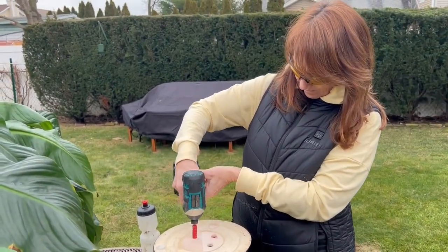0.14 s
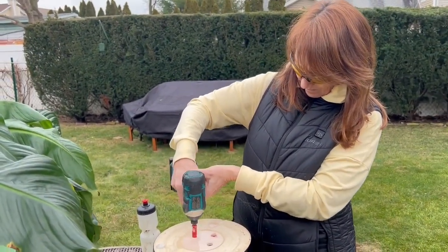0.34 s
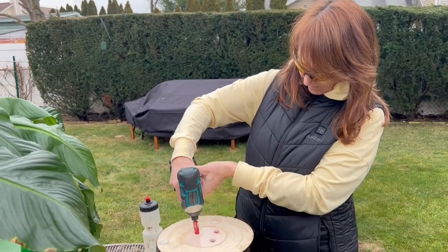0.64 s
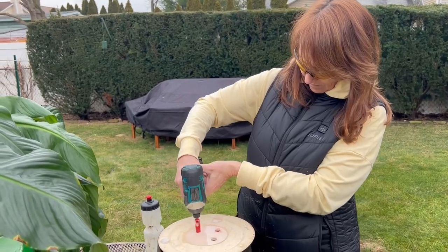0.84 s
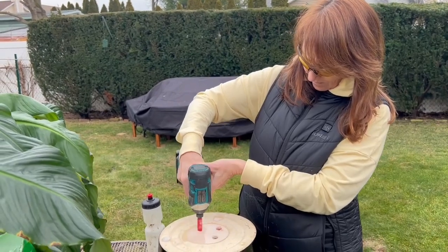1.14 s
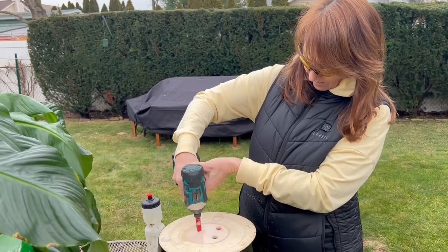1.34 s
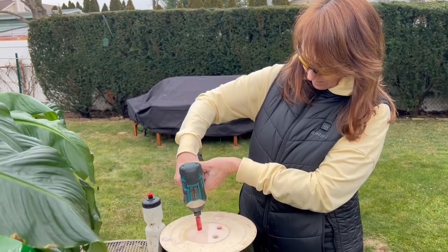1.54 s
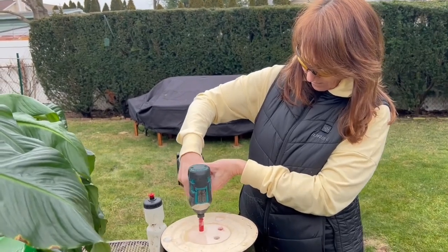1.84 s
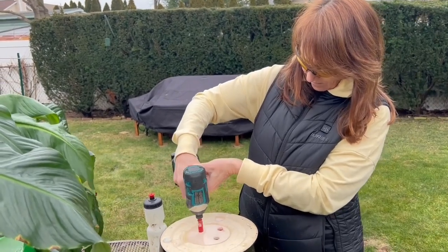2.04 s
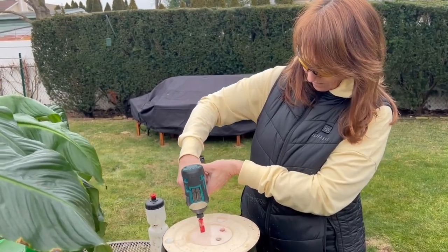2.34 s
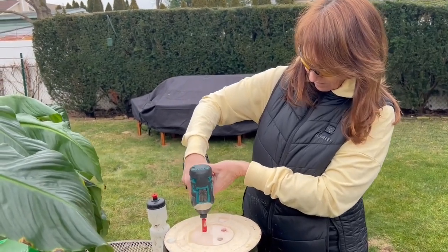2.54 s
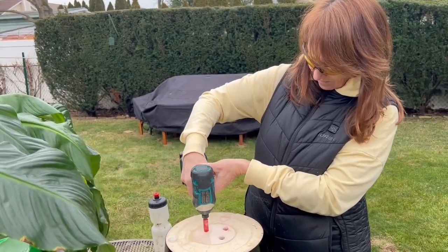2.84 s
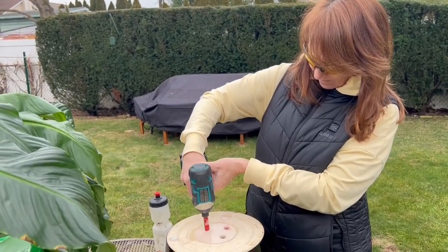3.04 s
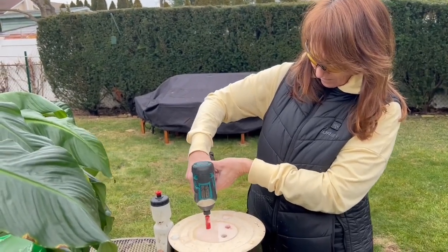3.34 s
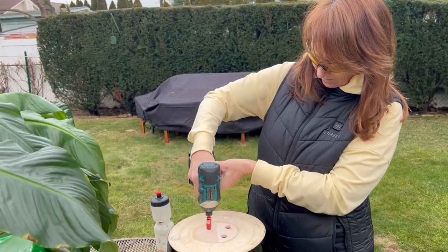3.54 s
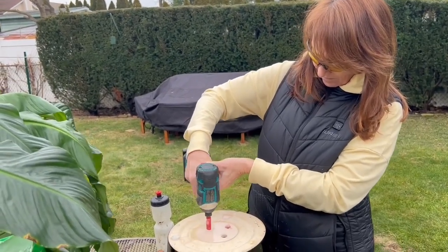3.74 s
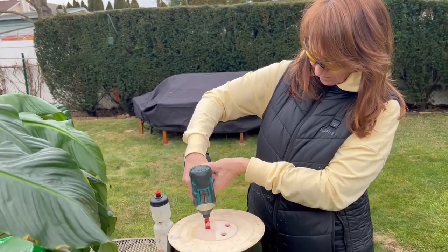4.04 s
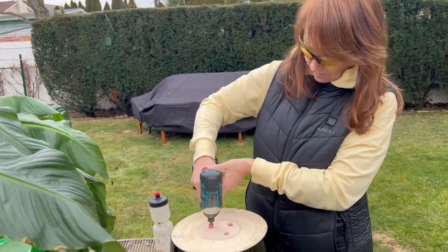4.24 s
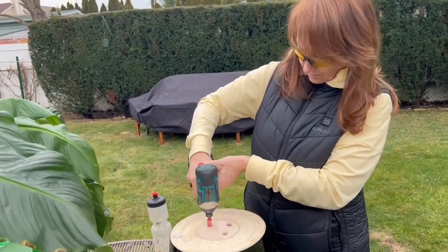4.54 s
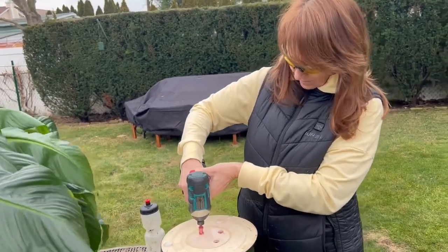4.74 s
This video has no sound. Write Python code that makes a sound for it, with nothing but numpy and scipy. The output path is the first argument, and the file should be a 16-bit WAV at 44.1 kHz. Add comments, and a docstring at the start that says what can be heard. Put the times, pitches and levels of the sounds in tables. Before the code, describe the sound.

From 0 s a cordless drill is already cutting an upturned ceramic pot in an open garden, heard in stereo from a metre or two. Dense grit bites make a harsh, metallic-sounding ceramic ring, strongest around 1, 1.8 and 3 kHz, over a wavering hollow boom near 260 Hz. A rapid throb of about 25 per second, motor hum and thin whine follow the drill speed. Dusty, airy hiss starts softer and grows by about 1 s. Pitch rises slightly until 1.9 s, sags near 2.2 s, then partly recovers; irregular catches jolt the grind, harder around 1.55 and 2.9 s. At 4.03 s a brief squeak near 950 Hz leads to a sharp breakthrough knock at 4.09 s, with hollow boom, dull blows and loose rattle. More squeaks follow around 4.2 s. After 4.28 s grinding and hiss collapse, leaving faint low hum and garden air, with a tiny faint squeak at 4.86 s.

```python
"""In a garden, a cordless drill grinds a diamond core bit through the base of an upturned ceramic pot, a metre or two
from a phone. Random grit bites ring the pot's modes and throb once a turn, with sine tones locked to the motor;
filtered noise makes the dust and cooling-air hiss. The bit breaks through with a knock of half-sine blows, squeaks
in near-pure tones and runs down over a low sine hum and faint noise of garden air."""
import sys
import numpy as np
from scipy import signal
from scipy.fft import rfft, irfft
from scipy.io import wavfile
from scipy.ndimage import uniform_filter1d

SR = 44100
rng = np.random.default_rng(int(sys.argv[2]) if len(sys.argv) > 2 else 0)


def persist_wave(psi):
    """Save psi, clipped to +-1, as 16-bit WAV."""
    counts = np.round(np.clip(psi, -1, 1) * 32767).astype(np.int16)
    wavfile.write(sys.argv[1], SR, np.atleast_2d(counts).T)


N = 215693

THROUGH_S, RELEASE_S = 4.09, 4.28  # the bit breaks through; the trigger is let go
GEAR_RATIO = 32 / 3  # motor turns per chuck turn
# the hollow's boom wavers as the hands rock the drill; its pitch dips after the breakthrough, then rises again:
# [start_s, pitch_hz, level_db against the cut]
HOLLOW_PATH = [(0, 260, 1), (.2, 252, 1), (.4, 260, -3), (.77, 257, -4), (.92, 276, 2), (1.1, 259, 1),
               (1.33, 256, -1), (1.56, 265, 4), (1.65, 262, -2), (1.93, 257, -4), (2.02, 246, 2),
               (2.17, 232, 1), (2.27, 258, 0), (2.53, 266, 5), (2.67, 258, -7), (2.77, 251, 1),
               (3.04, 256, 2), (3.16, 257, -5), (3.37, 266, 2), (3.6, 254, 0), (3.7, 262, -6),
               (3.9, 256, 0), (4.08, 262, -1), (4.1, 262, -2), (4.12, 244, -4), (4.16, 240, -5),
               (4.2, 236, -4), (4.32, 230, 3), (4.42, 270, 0)]


def pot(grind_db, hollow_db, turn, throb_db):
    """Bites, blows and catches ring the pot's modes; each hears them its own way and wanders as the hands rock."""
    # modes of the pot, the hollow's air first: [pitch_hz, nominal width_hz, relative left_db, right_db,
    # lead_rad of the right side]
    pot_modes = [(258, 35, -38.7, -39.6, -0.15), (735, 55, -47.3, -51.9, -0.68),
                 (820, 50, -49.5, -54.4, -0.68), (965, 35, -36.4, -43.1, -0.42),
                 (1010, 40, -34.3, -39.4, -0.57), (1125, 45, -33.2, -44.6, 0.06),
                 (1190, 40, -37.1, -46.2, -0.47), (1355, 60, -48, -54, -0.01),
                 (1635, 50, -43.8, -50.7, -0.13), (1770, 30, -37.7, -39.7, 1.18),
                 (1820, 30, -34.4, -38.1, 0.39), (2000, 60, -45, -42, 0.23), (2065, 50, -48, -45, 0.1),
                 (2190, 90, -51, -48, -0.2), (2530, 70, -50.2, -45.4, -0.72),
                 (2930, 70, -35.4, -30.3, -2.02), (3040, 60, -34.5, -30.5, -2.02),
                 (3160, 40, -45.9, -42.5, -2.16), (3470, 50, -44.2, -41.8, -2.85),
                 (3590, 50, -50, -49.5, 2.99), (3710, 70, -49, -49, 1.5), (3920, 60, -48, -48, 1.5),
                 (4040, 80, -46.4, -46.9, 2.31), (4195, 85, -43, -40.7, -0.91), (4310, 45, -45, -44, -3.03),
                 (4470, 60, -44.6, -46.5, 2.79), (4765, 50, -52.3, -47.5, 0.65),
                 (5050, 70, -47.4, -47.8, 2.8), (5780, 120, -44.0, -48.1, 2.21),
                 (6090, 60, -45.7, -52.4, 0.99), (6510, 60, -46.6, -52.7, 1.58),
                 (7310, 80, -49.4, -50.1, 0.88), (7510, 45, -49.8, -52.6, 0.51),
                 (7745, 55, -45.5, -46.3, 0.88)]
    coast_db, coast_db_per_s, coast_hz = -25, 72, 4000
    chatter_db, chatter_per_s = 1.8, 70
    boom_clean = 1.4  # size of the clean tone in the boom
    sway_s = 2.5e-5 * walk(3.66)  # hands and drill shift the path to one side

    bites, knock, grab = grit(2500, 3.7), blows(), catches(turn)
    hollow_hz = pot_modes[0][0]
    bend = np.exp(2j * np.pi * np.cumsum(curves(HOLLOW_PATH)[0] - hollow_hz) / SR)
    # the coasting bit still brushes the hole, brightest near coast_hz
    coast_level_db = coast_db - coast_db_per_s * since(RELEASE_S) + 4 * walk(15)
    coast = (since(RELEASE_S) > 0) * undb(coast_level_db)
    # quick shudder shared by the wall modes, without slow swells
    shudder = walk(chatter_per_s)
    shudder_db = chatter_db * (shudder - uniform_filter1d(shudder, size=SR // 8))
    clean = boom_clean * undb(hollow_db) * np.exp(2j * np.pi * hollow_hz * since(0))
    clean = clean * (since(THROUGH_S) == 0)

    out = np.zeros((2, N))
    for hz, width, left_db, right_db, lead in pot_modes:
        is_hollow = hz < 400
        if is_hollow:
            drive_db, knock_db = hollow_db - 1.5, 44
        else:
            drive_db, knock_db = grind_db + shudder_db, 42
        throb = .5 * throb_db * np.cos(turn - .5 * rng.standard_normal())
        drive_db = drive_db + throb + .7 * walk(30)
        brush = coast / (1 + (np.log(hz / coast_hz) / 0.25) ** 2)
        dust = rng.standard_normal(N)
        force = (0.47 * bites + 0.76 * dust) * (undb(drive_db) + brush)
        # a grab is a blunt push on the wall: lower modes take most of it, the air in the hollow none
        near = signal.butter(1, [hz / 1.25, hz * 1.25], "bandpass", fs=SR)
        push = signal.lfilter(*near, dust * undb(grind_db) * grab)
        jolt = (hz > 400) * push / (1 + (hz / 2200) ** 2)
        mode = ring(force + knock * undb(knock_db), jolt, hz, width)
        if is_hollow:
            mode = (mode + clean) * bend
        out[0] += undb(left_db) * mode.real
        out[1] += undb(right_db) * (mode * np.exp(1j * (lead + 2 * np.pi * hz * sway_s))).real
    return out


def grit(per_s, spread_db):
    """Dense bites of diamond grains as random-signed impulses, a few much harder than the rest; rms 1."""
    hardest = 4.5  # the hardest grain stands this many spreads above the softest
    chance = rng.random((3, N))
    bite = chance[0] < per_s / SR
    sign = np.sign(chance[1] - .5)
    hardness = np.minimum(-np.log(1 - chance[2]), hardest)
    return unit(bite * sign * undb(spread_db * hardness))


def catches(turn):
    """Force envelope of the rim's high spot: a sudden grab once a turn, of random size, plus hard catches."""
    # hard catches of the rim while it cuts: [start_s, level_db before the force gain]
    hard_catches = [(0.122, -16), (0.528, -13), (0.986, -15), (1.1, -13), (1.291, -15), (1.441, -14),
                    (1.555, -6), (1.788, -13), (2.275, -15), (2.47, -14), (2.648, -15), (2.882, -7),
                    (3.474, -15), (3.513, -13)]
    force_gain_db = 21
    count = (turn / (2 * np.pi) + 0.28).astype(int)
    size_db = -10.5 + 5.1 * rng.standard_normal(count[-1] + 1)
    grabs = np.diff(count, prepend=count[0]) * undb(size_db)[count]
    for s, db in hard_catches:
        grabs[int(s * SR)] += undb(db + force_gain_db)
    return signal.lfilter([1], [1, -np.exp(-1 / (.003 * SR))], grabs)  # each dies away over 3 ms


def blows():
    """Short half-sine pushes on the pot; a longer contact makes a duller blow."""
    # blows as the bit drops through: [start_s, relative level_db, contact_s]
    knocks = [(4.0937, 0.5, 0.00015), (4.102, -9.5, 0.0013), (4.107, -14, .0003), (4.124, -15, 0.00052),
              (4.139, -8.5, 0.00048), (4.16, -10.5, 0.00057)]
    force = np.zeros(N)
    for s, db, contact in knocks:
        phase = (np.arange(64) - s * SR % 1) / (contact * SR)
        push = np.sin(np.pi * np.clip(phase, 0, 1))
        force[int(s * SR):int(s * SR) + 64] += undb(db) * push / push.sum()
    return force


def ring(force, jolt, hz, width):
    """A mode as one complex pole used twice: steep skirts for a steady force; a jolt skips a stage, speaks at once."""
    pole = np.exp(np.pi * (2j * hz - 1.34 * width) / SR)
    q = abs(pole) ** 2
    built = signal.lfilter([1], [1, -pole], force) + jolt * np.sqrt(1 + q) / (1 - q)
    level = np.sqrt(2 * (1 - q) ** 3 / (1 + q))  # evens out narrow and wide modes
    return level * signal.lfilter([1], [1, -pole], built)


def tones(turn, motor_hz, grind_db, hiss_db):
    """Clean lines locked to the speed: rim bumps, the motor's unbalance and the gear whine."""
    # the bit's uneven rim repeats its bumps every turn: [multiple of the chuck speed, relative level_db]
    rim_bumps = [(5, -65), (6, -64), (7, -58), (8, -63), (9, -51), (10, -41), (11, -54), (12, -61),
                 (13, -66)]
    motor_db, whine_db, pinion_order = -47, -49, 5  # before the level curves; whine cycles per motor turn
    hollow_hz, hollow_width_hz = 266.6, 21

    rim = sum(undb(db + 3.0 * walk(9)) * np.sin(k * turn + 1.0 * walk(6)) for k, db in rim_bumps)
    # all three fade out in the last 14 ms before the rim leaves the ceramic
    cutting = np.clip((THROUGH_S - np.arange(N) / SR) / 0.014, 0, 1)
    # the motor is loudest where it meets the hollow's pitch
    booms = 1 / (1 + (2 * (motor_hz - hollow_hz) / hollow_width_hz) ** 2)
    motor = booms * undb(motor_db + 2.0 * walk(10.0)) * np.sin(GEAR_RATIO * turn)
    whine_level = undb(whine_db + hiss_db + 1.2 * walk(11))
    whine = whine_level * np.sin(pinion_order * GEAR_RATIO * turn)
    low = (rim * undb(-6.0) + motor) * undb(grind_db + curves(HOLLOW_PATH)[1])
    return np.sqrt(2) * cutting * (low * undb([[.5], [-.5]]) + whine * undb([[0], [-7]]))


def hiss(cut_db, hiss_db, turn, throb_db):
    """Rasp of dust that follows the cut, cooling air above it; turned in phase between the sides, partly unlike."""
    # hiss colour: [pitch_hz, relative level_db per Hz]
    hiss_shape = [(450, -30), (700, -10), (1500, -3), (2400, 1), (3500, 5), (5000, 5), (6800, 2), (8300, 7),
                  (8650, -3), (8900, 6), (9500, 5), (10250, -9), (10700, -2), (11100, 1), (12500, -1),
                  (13800, 3), (14500, -4), (15200, 0)]
    # phase of the right side of the hiss against the left, by pitch: [pitch_hz, lead_rad of the right side]
    side_phase = [(100, -.1), (900, -.5), (1700, .4), (2400, -.5), (3000, -2), (4300, -3.4), (6000, -4.3),
                  (7000, -5.8), (8300, -5.2), (9200, -3.14), (11000, -3.14), (12300, 0), (14500, 0),
                  (15500, 3.14)]
    # the part that differs between the sides, before the hiss colour: [pitch_hz, relative level_db per Hz]
    unlike_shape = [(500, -12), (5000, -3), (8500, -4), (9300, -30), (10800, -30), (11500, -4),
                    (12400, -30), (14400, -25), (15000, -4)]
    rasp_db, cooling_db = -32.5, -33.5  # before the cut and hiss curves

    shared = rfft(.5 * grit(4000, 2.1) + rng.standard_normal(N))
    own = rfft(rng.standard_normal((2, N))) * undb(spread(unlike_shape))
    sides = own + [shared, shared * np.exp(1j * spread(side_phase))]
    both = unit(irfft(sides * undb(spread(hiss_shape)), N))
    rasp = signal.sosfiltfilt(signal.butter(4, 6000, fs=SR, output="sos"), both)
    cooling = both - rasp
    flutter = undb(0.17 * throb_db * np.cos(turn) + 1.0 * walk(40))
    rasp_level = undb(rasp_db + 0.17 * cut_db + 0.42 * hiss_db)
    return flutter * (rasp * rasp_level + cooling * undb(cooling_db + hiss_db))


def squeaks():
    """Stick-slip locks on to one mode: a near-pure tone that swells, holds and rings out."""
    # the bit's wall squeaks in the hole: [start_s, length_s, pitch_hz, level_db of the left side's peak]
    squeak_list = [(4.03, 0.039, 944, -24.5), (4.084, 0.016, 958, -15.5), (4.202, 0.022, 955, -14.5),
                   (4.236, 0.039, 952, -24.5), (4.277, 0.023, 962, -34), (4.347, 0.024, 960, -50),
                   (4.861, 0.033, 958, -60.5)]
    t, out = np.arange(N) / SR, np.zeros(N)
    for s, length, hz, db in squeak_list:
        swell = np.clip((t - s) / .005, 0, 1)
        ring_out = np.exp(-np.clip(t - s - length, 0, None) / .006)
        phase = 2 * np.pi * np.cumsum(hz * (1 + 0.0023 * walk(60))) / SR
        tone = np.sin(phase) + 0.042 * np.sin(2 * phase)
        out += undb(db + 0.49 * walk(83)) * swell * ring_out * tone
    return out * undb([[0], [-6.5]])


def clunk():
    """Each blow also cracks and shakes the table: a sharp snap, a short dull rattle and a thud."""
    t = np.arange(SR // 5) / SR
    band = signal.butter(2, [90, 800], "bandpass", fs=SR, output="sos")
    rattle = 0.23 * np.exp(-t / 0.01) * signal.sosfilt(band, rng.standard_normal(SR // 5))
    crack = 0.6 * np.exp(-t / 0.0098) * np.diff(rng.standard_normal(SR // 5 + 1))
    thud = 0.022 * np.exp(-t / 0.015) * np.sin(2 * np.pi * 140 * t)
    thud += .08 * np.exp(-t / .008) * np.sin(2 * np.pi * 272 * t)
    thud += 0.012 * np.exp(-t / 0.02) * np.sin(2 * np.pi * 228 * t)
    return undb(-3.5) * signal.fftconvolve(blows(), rattle + crack + thud)[:N]


def loose_core():
    """The freed core rattles inside the pot: coloured random impacts that die away from the breakthrough."""
    level_db = -41 - 90 * since(THROUGH_S) + 3 * walk(37)
    shape = [(250, -26.5), (400, -2), (600, 2), (750, -1.5), (1100, -38.5)]
    return (since(THROUGH_S) > 0) * undb(level_db) * colour(grit(300, 1.8), shape)


def table_rumble(hollow_db):
    """The table under the pot rumbles: coloured grit bites that follow the hollow's level."""
    # rumble colour: [pitch_hz, relative level_db per Hz]
    rumble_shape = [(40, -24.5), (90, 9.5), (150, -23), (220, 20), (330, 20), (370, -32), (400, -72.5),
                    (450, -39), (600, 13.5), (700, -45.5)]
    return colour(grit(880, 1.6), rumble_shape) * undb(hollow_db - 53.0)


def outdoor_tail(near):
    """Hedge and houses give a short dull tail: low-passed noise, unlike at each side, that decays 60 dB in 0.42 s."""
    t = np.arange(SR // 2) / SR
    tail = (t > .015) * np.exp(-np.log(1000) * t / .42) * rng.standard_normal((2, SR // 2))
    tail = signal.lfilter([.3], [1, -.7], tail) * undb(-48.5)
    return signal.fftconvolve(near, tail, axes=1)[:, :N]


def garden():
    """A low hum and faint patchy air, nearly the same at both sides; bass, middle and treble swell on their own."""
    # hum level: [start_s, level_db]
    hum_path = [(0, -50.5), (2.5, -52), (4, -56.5), (4.3, -57), (4.5, -62), (4.7, -72), (4.8, -61.5),
                (4.86, -69.5)]
    # garden air colour: [pitch_hz, relative level_db per Hz]
    air_shape = [(30, -24), (50, -2), (80, -2), (180, -13), (400, -15), (750, -17), (3300, -37),
                 (4400, -38), (6000, -52), (12000, -64)]
    hum_hz, air_db = 70.6, -60  # air level before the band gains

    hum_level = undb(curves(hum_path)[0] + 1.0 * walk(12))
    hum = np.sqrt(2) * hum_level * np.sin(2 * np.pi * hum_hz * np.arange(N) / SR)
    mid, side = (colour(rng.standard_normal(N), air_shape) for _ in range(2))
    air = mid + .22 * side * np.array([[1], [-1]])
    bass, dull = (signal.sosfiltfilt(signal.butter(2, hz, fs=SR, output="sos"), air) for hz in (150, 900))
    middle, treble = dull - bass, air - dull
    bass_db, middle_db, treble_db = 2.5 * walk(16), 2 * walk(12), .8 * walk(6)
    patchy = bass * undb(3.5 + bass_db) + middle * undb(0.3 + middle_db) + treble * undb(-0.5 + treble_db)
    return hum + undb(air_db) * patchy


def undb(db):
    """Gain of a level in dB."""
    return 10 ** (np.asarray(db) / 20)


def unit(x):
    """Scaled to rms 1."""
    return x / np.sqrt(np.mean(np.abs(x) ** 2))


def since(s):
    """Seconds gone since a moment; zero before it."""
    return np.clip(np.arange(N) / SR - s, 0, None)


def curves(table):
    """Columns of a table joined by straight lines in time."""
    s, *columns = np.transpose(table)
    return [np.interp(np.arange(N) / SR, s, c) for c in columns]


def walk(rate):
    """Random levels held 1 / rate s and slewed twice; rms 1."""
    k = int(SR / rate)
    steps = np.repeat(rng.standard_normal(N // k + 1), k)
    return unit(uniform_filter1d(uniform_filter1d(steps, k), k)[:N])


def spread(shape):
    """Points of pitch and value read at every frequency bin, straight on a log axis."""
    hz, value = np.transpose(shape)
    return np.interp(np.log(np.fft.rfftfreq(N, 1 / SR) + 1), np.log(hz), value)


def colour(x, shape):
    """Filter by points of pitch and dB; rms 1."""
    return unit(irfft(rfft(x) * undb(spread(shape)), N))


def scene():
    """Drill, pot and garden: level and speed curves drive every layer, with a short dull tail behind."""
    # how hard the rim cuts and how loud the hiss is, against steady drilling: [start_s, cut_db, hiss_db]
    drill_path = [(0, 0, -7.5), (.74, -1.5, -6), (.97, 0.5, -1), (1.34, 1, 0.5), (1.8, 1, 0), (2.2, 0, -1),
                  (2.55, 2, -2.5), (2.78, 0, -1), (3.4, 1.5, -1), (3.52, 0.5, -0.5), (3.62, -2.5, -0.5),
                  (3.77, -1.5, -1.5), (3.86, 2, 2), (4.04, -2.5, 1), (4.07, -3.5, -8.5), (4.11, 1.5, 0),
                  (4.2, -2.5, -2.5), (4.27, -7, -2)]
    # motor speed before the run-down, bent by load and the hands' pressure: [start_s, turns_per_s]
    motor_path = [(0, 268), (.9, 276), (1.1, 287), (1.38, 282), (1.62, 288.5), (1.85, 288), (2.1, 270),
                  (2.2, 258), (2.75, 273), (2.95, 274), (3.1, 272), (3.4, 279), (3.5, 276), (3.65, 263),
                  (3.85, 270), (4.26, 270)]
    # after the release the ring, dust and hiss die away and the motor slows
    ring_db_per_s, dust_db_per_s, slows_hz_per_s = 300, 69, 170
    hiss_db_per_s, hiss_cuts_s, hiss_cuts_db_per_s = 123, 4.342, 258
    # the air in the pot booms as the bit drops through, then fades
    hollow_rest_db, hollow_open_db, hollow_db_per_s = -7.5, 26.5, 110

    cut_db, hiss_db = curves(drill_path)
    grind_db = cut_db - ring_db_per_s * since(RELEASE_S)
    dust_db = cut_db - dust_db_per_s * since(RELEASE_S)
    hiss_db = hiss_db - hiss_db_per_s * since(RELEASE_S) - hiss_cuts_db_per_s * since(hiss_cuts_s)
    opened_db = hollow_open_db * (since(THROUGH_S) > 0) - hollow_db_per_s * since(THROUGH_S)
    hollow_db = cut_db + opened_db + curves(HOLLOW_PATH)[1]
    motor_hz = curves(motor_path)[0] - slows_hz_per_s * since(RELEASE_S)
    throb_db = 1 + .2 * np.clip(motor_hz - 270, 0, None)  # a faster bit wobbles more
    turn = 2 * np.pi * np.cumsum(motor_hz / GEAR_RATIO) / SR  # chuck angle in radians

    rumble = table_rumble(hollow_db)
    near = pot(grind_db, hollow_rest_db + hollow_db, turn, throb_db)
    near += hiss(dust_db, hiss_db, turn, throb_db) + squeaks()
    near += loose_core()
    near += tones(turn, motor_hz, grind_db, hiss_db) + rumble + clunk()
    return near + outdoor_tail(near) + garden()


def record(dry):
    """The top is cut by a steep low-pass at 15720 Hz."""
    return signal.sosfilt(signal.ellip(14, .2, 80, 15720, fs=SR, output="sos"), dry)


dry = scene()
out = record(dry)
persist_wave(out)
```